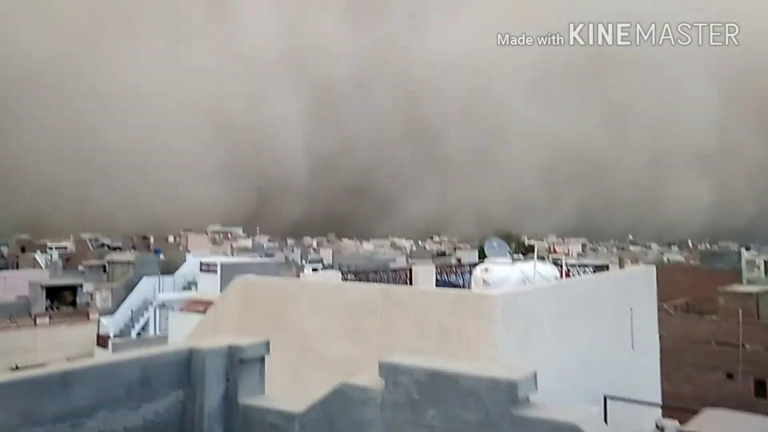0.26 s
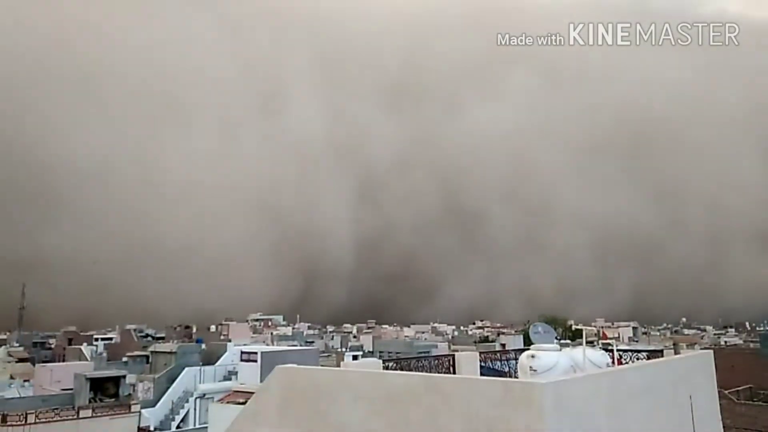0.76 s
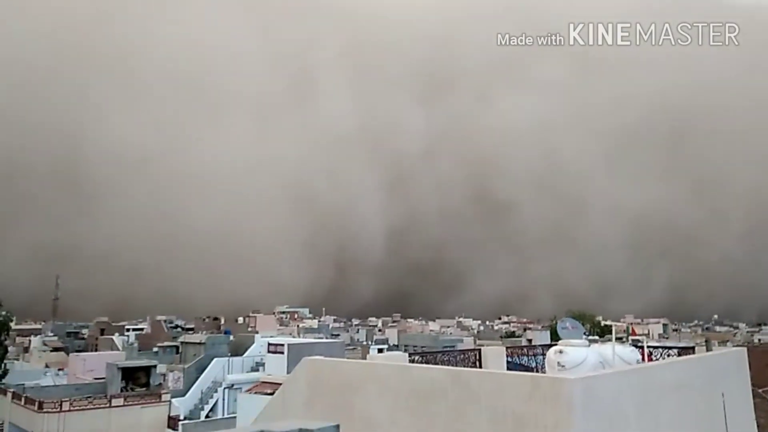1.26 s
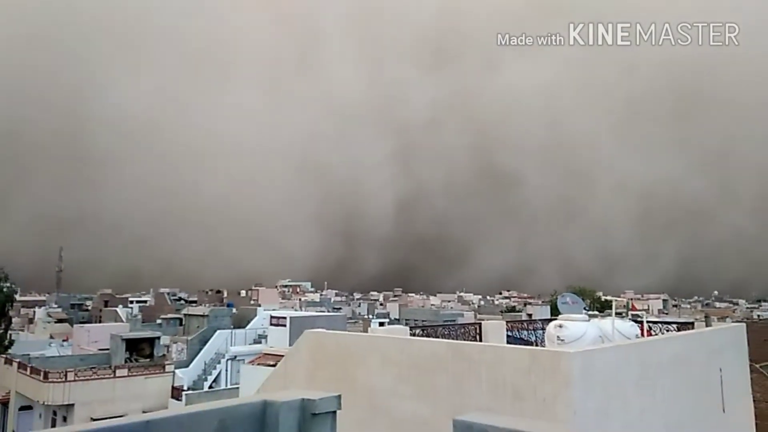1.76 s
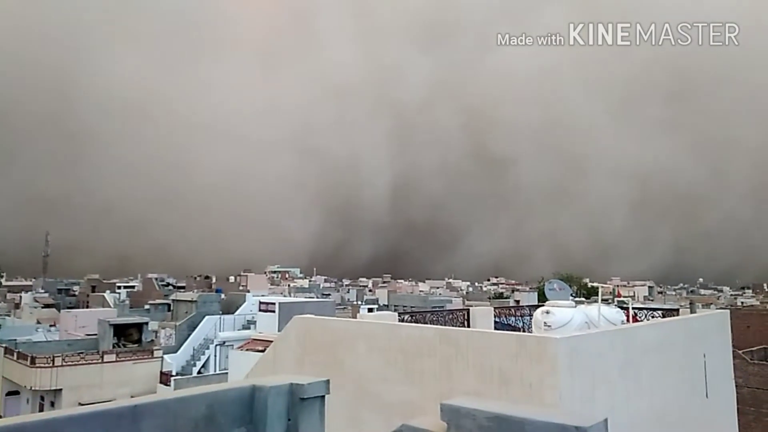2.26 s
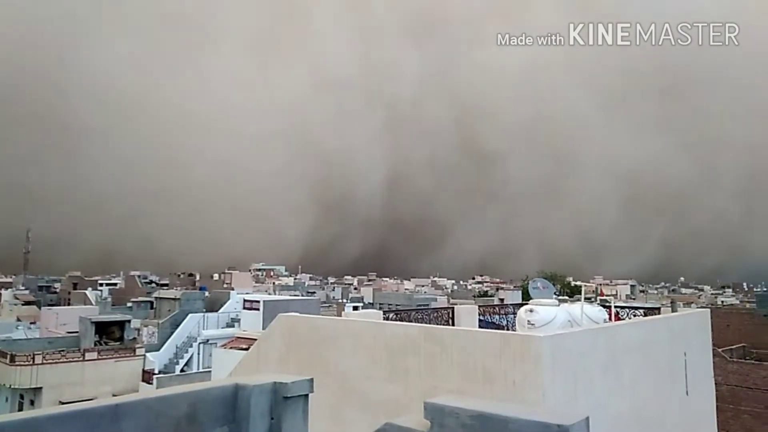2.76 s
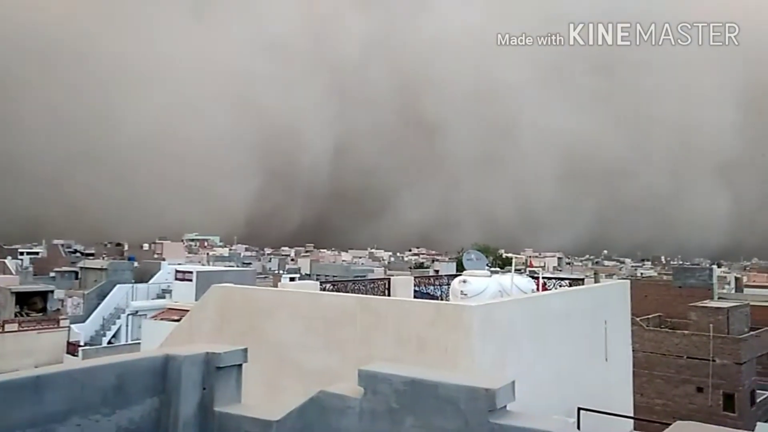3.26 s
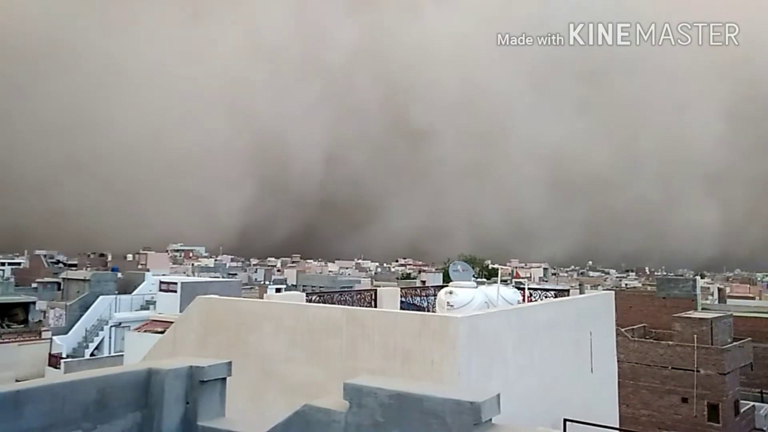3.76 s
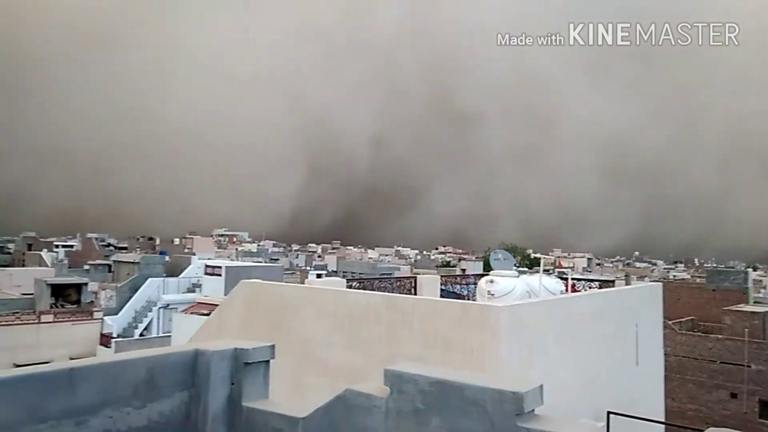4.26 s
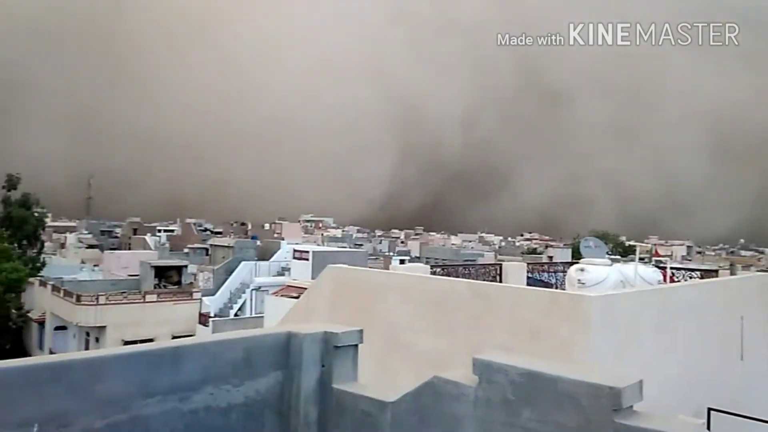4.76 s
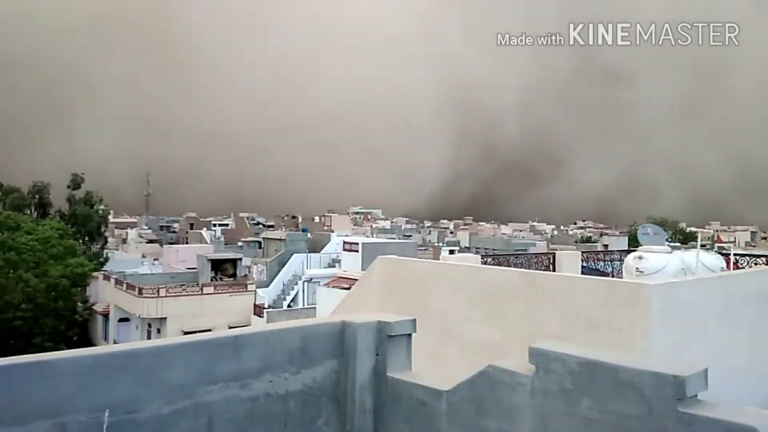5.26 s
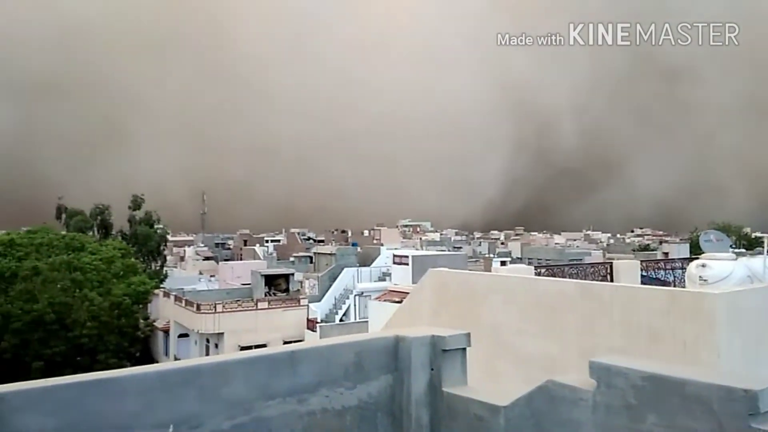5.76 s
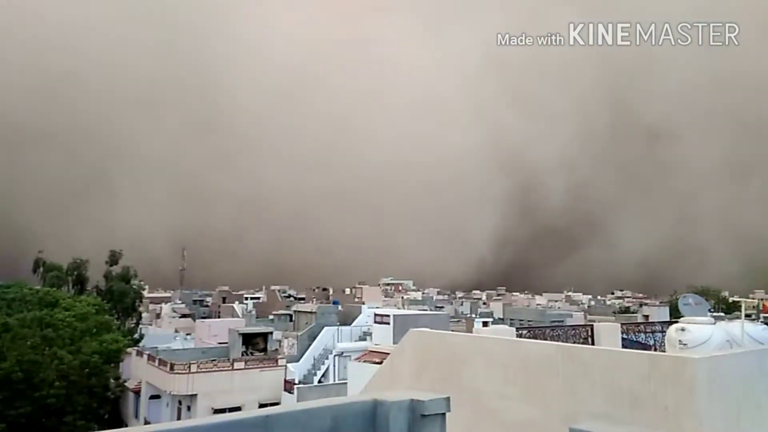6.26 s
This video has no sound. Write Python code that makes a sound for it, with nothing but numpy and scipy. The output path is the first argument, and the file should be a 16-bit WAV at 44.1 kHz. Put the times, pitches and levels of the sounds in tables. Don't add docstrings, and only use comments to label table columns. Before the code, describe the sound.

Low, rough wind rushes without pause over a small exposed microphone outdoors, swelling and easing, with dull thuds, quick flaps and a few dust ticks.

```python
import sys
import numpy as np
from scipy import signal
from scipy.fft import rfft, irfft
from scipy.io import wavfile
from scipy.ndimage import uniform_filter1d

SR = 44100
rng = np.random.default_rng(int(sys.argv[2]) if len(sys.argv) > 2 else 0)


def wrap_up_sound(samples):
    columns = np.atleast_2d(samples).T
    tamed = np.clip(columns, -1, 1)
    steps = np.round(tamed * 32767).astype(np.int16)
    wavfile.write(sys.argv[1], SR, steps)


def convert_level_to_amplitude(level_db):
    exponent = np.asarray(level_db, float) / 20
    return 10 ** exponent


N = 287532


def unit(x):
    return x / np.sqrt(np.mean(x ** 2))


def colour(x, points):
    hz, db = np.transpose(points)
    log_hz = np.log(np.arange(len(x) // 2 + 1) * SR / len(x) + 1)
    return irfft(rfft(x) * convert_level_to_amplitude(np.interp(log_hz, np.log(hz), db)), len(x))


def walk(rate):
    hold = int(SR / rate)
    steps = np.repeat(rng.standard_normal(N // hold + 1), hold)
    return unit(uniform_filter1d(uniform_filter1d(steps, hold), hold)[:N])


def bandpass(x, low_hz, high_hz, order=2):
    return signal.sosfilt(signal.butter(order, [low_hz, high_hz], "band", fs=SR, output="sos"), x)


def band(hz):
    return unit(bandpass(rng.standard_normal(N), hz / 2 ** (1 / 4), hz * 2 ** (1 / 4)))


def eddies(rows):
    out = np.zeros(N + 2 * SR)
    chance = rng.random((len(rows), 2))
    for (s, db, hz, cycles), (turn, drift) in zip(rows, chance):
        sigma = cycles / hz / 2.5
        reach = int(4 * sigma * SR)
        t = np.arange(-reach, reach) / SR
        if s + sigma >= N / SR:
            turn = .5
        bend = 1 + 0.084 * (drift - .5) * t / sigma
        phase = 2 * np.pi * (hz * t * bend + turn)
        at = SR + int((s + t[0]) * SR)
        out[at:at + len(t)] += convert_level_to_amplitude(db) * np.exp(-(t / sigma) ** 2 / 2) * np.cos(phase)
    return out[SR:SR + N]


# (time [s], depth [dB], pitch [Hz])
LULL_DIPS = [(0.2, -3, 107), (0.345, -3.5, 151), (0.53, -6, 151), (1.145, -5, 45), (1.252, -5, 151),
             (1.256, -5, 64), (1.395, -5, 45), (1.629, -6, 45), (1.768, -3.5, 360), (1.887, -7, 45),
             (2.054, -5, 45), (2.215, -3.5, 720), (2.298, -5.5, 180), (2.4, -5, 45), (2.617, -7.5, 45),
             (3.141, -5, 45), (3.5, -8, 200), (3.778, -6.5, 107), (4.108, -3, 45), (4.208, -4.5, 720),
             (4.216, -5, 45), (4.309, -6.5, 214), (4.545, -3.5, 90), (4.616, -5, 45), (5.459, -7, 303),
             (5.564, -4.5, 605), (5.591, -10, 45), (5.815, -5, 45), (5.83, -3.5, 180), (6.519, -5, 45),
             (6.519, -6, 107)]


def lulls(t, hz):
    loss_db = 0
    for s, db, centre_hz in LULL_DIPS:
        away_time = (t - s) / 0.037
        away_pitch = np.log2(hz / centre_hz) / 0.49
        loss_db = loss_db + db * np.exp(-away_time ** 2 / 2 - away_pitch ** 2 / 2)
    return loss_db


# (time [s], strength [dB], eddy size [dB], above 0 it rumbles and below 0 it rushes)
WIND = [(0.0, -30, -9), (0.13, -26.5, -2.5), (0.31, -27.5, -4.5), (1.85, -29, -1), (2.09, -29.5, -8.5),
        (2.43, -29, 7), (2.47, -29, 4.5), (2.81, -27, 4.5), (3.29, -28.5, 1), (3.79, -28, 0),
        (3.9, -26.5, 10), (4.5, -29.5, 5), (4.56, -27, -11.5), (4.65, -27.5, 11.5), (5.27, -27.5, -0.5),
        (5.54, -27, 7.5), (5.9, -29.5, -6.5), (6.52, -27, 0)]


def gusts():
    s, strength_db, size_db = np.transpose(WIND)
    t = np.arange(N) / SR
    return np.interp(t, s, strength_db), np.interp(t, s, size_db)


# (frequency [Hz], level [dB per Hz])
STREAM_SPECTRUM = [(20, -19), (35, 2.5), (70, -1.5), (170, -2), (330, -9.5), (600, -20.5), (1100, -31.5),
                   (2000, -43.5), (3500, -54), (6000, -74)]


def stream(rush_db, bass_db, treble_db):
    out = 0
    slow, middle, quick = walk(26), walk(30), walk(60)
    level_db = rush_db.mean()
    rush_db, bass_db, treble_db = (x - x.mean() for x in (rush_db, bass_db, treble_db))
    for k in range(17):
        hz = 22 * 2 ** (k / 2)
        low = np.clip((4.5 - k) / 1.5, 0, 1)
        high = np.clip((k - 9) / 2, 0, 1)
        fade = np.clip(1.2 - 0.2 * max(k - 11, 0), 0, 1)
        surge_db = 2.2 * low * slow + 1.9 * (1 - low) * (1 - high) * middle
        surge_db = surge_db + (1.3 * middle + 1.7 * quick) * high
        tilt_db = 0.52 * low * bass_db + 0.58 * high * treble_db
        db = fade * (rush_db + tilt_db + surge_db + 1.73 * walk(12 + 3 * k))
        db = db + np.repeat(lulls(np.arange(0, N, 64) / SR, hz), 64)[:N]
        out = out + convert_level_to_amplitude(db) * np.sqrt(hz) * band(hz)
    return unit(colour(out, STREAM_SPECTRUM)) * convert_level_to_amplitude(level_db + 5.0)


# (frequency [Hz], level [dB per Hz])
HISS_SPECTRUM = [(1500, 5.5), (4000, -4), (6500, -6.5), (7800, -4), (9100, -0.5), (10300, -6.5),
                 (12000, -14.5), (15500, -19.5), (20000, -5.5)]


def hiss():
    shimmer_db = .3 * walk(14) + .7 * walk(60)
    noise = colour(rng.standard_normal(N), np.vstack([[(300, -30.0)], HISS_SPECTRUM]))
    return unit(noise) * convert_level_to_amplitude(-59.0 + shimmer_db)


def swarm(rate):
    when, size, octave, length = rng.random((int(rate * N / SR), 4)).T
    octave = 2.65 * octave
    db = -32 - 7.3 * octave - 2.6 * np.log(size + 0.048)
    return eddies(np.transpose([when * N / SR, db, 350 * 2 ** octave, 1.4 + 2.0 * length]))


def crowd(gust_db, rate):
    when, size, octave, length = rng.random((int(rate * N / SR), 4)).T
    octave = 3.55 * octave
    hz = 42 * 2 ** octave
    s = when * N / SR
    db = -21 - 2.5 * octave - 0.5 * np.log(size + 0.036)
    db = db + (gust_db - gust_db.mean())[(when * N).astype(int)] + lulls(s, hz)
    return eddies(np.transpose([s, db, hz, 0.6 + octave * (0.63 + 2.1 * length)]))


# (start [s], length [s], peak [dB], lowest pitch [Hz])
VORTEX_TRAINS = [(0.26, 0.034, -18, 426), (0.49, 0.068, -19, 286), (0.695, 0.01, -26, 730),
                 (1.592, 0.041, -16.5, 380), (1.786, 0.058, -26.5, 680), (2.18, 0.039, -22.5, 480),
                 (2.31, 0.083, -27, 620), (2.834, 0.077, -16.5, 350), (3.617, 0.03, -15, 394),
                 (3.654, 0.05, -21, 560), (4.001, 0.03, -22, 466), (4.981, 0.045, -24, 480),
                 (5.1, 0.03, -20, 420), (5.158, 0.017, -23, 480), (6.125, 0.073, -18, 338),
                 (6.349, .014, -23.5, 496), (5.955, 0.012, -40, 1700), (0.695, 0.009, -34, 1230),
                 (2.311, 0.085, -35, 1530), (3.632, 0.015, -32.5, 1300), (1.598, 0.025, -35, 770),
                 (4.007, 0.008, -45, 1900), (0.057, 0.053, -29.5, 520), (3.3, .06, -28, 334),
                 (.85, .13, -22, 75), (1.1, .2, -20.5, 55), (3.24, 0.093, -21.5, 85), (5.72, .09, -21, 59),
                 (4.754, .1, -32.5, 670), (3.8, 0.027, -25.5, 367)]


def trains(count):
    late, chance, length = rng.random((len(VORTEX_TRAINS), count, 3)).T
    s, span, db, hz = np.transpose(VORTEX_TRAINS)
    order = np.arange(count)[:, None]
    octaves = np.clip(np.log2(2350 / hz), .2, 1.59)
    octave = octaves * ((order * 3 % count + chance) / count) ** 2
    when = s + span * (order + late) / count
    rows = np.transpose([when, db - 12.5 * octave, hz * 2 ** octave, 1.3 + 2.6 * length])
    return eddies(rows.reshape(-1, 4))


def shedding():
    t = np.arange(N) / SR
    on = sum((t > s) & (t < s + span) for s, span, *_ in VORTEX_TRAINS)
    return uniform_filter1d(1. * on, int(0.031 * SR))


# (time [s], peak [dB], pitch [Hz])
EDGE_FLUTTERS = [(.073, -30, 676), (.134, -32, 1170), (.161, -32, 800), (.392, -24.5, 1000),
                 (.559, -19.5, 580), (.66, -24.5, 900), (.801, -25, 870), (.847, -41, 1700),
                 (1.218, -29, 651), (2.507, -26, 890), (2.83, -29, 685), (3.048, -30, 1351),
                 (3.187, -22, 870), (3.565, -21.5, 665), (3.643, -13, 497), (3.709, -23, 770),
                 (3.75, -29, 1100), (3.824, -18, 507), (3.987, -34, 1800), (4.433, -33, 1490),
                 (4.729, -24, 790), (4.757, -32, 1290), (4.793, -31, 1176), (4.911, -24, 880),
                 (5.182, -25.5, 1024), (5.528, -33.5, 1783), (5.39, -40, 1500), (6.079, -31, 640),
                 (6.231, -33, 1300), (6.316, -26, 690)]


def flutters():
    hz = np.transpose(EDGE_FLUTTERS)[2]
    cycles = 0.86 + 1.3 * rng.random(len(hz)) * hz / 800
    return eddies(np.column_stack([EDGE_FLUTTERS, cycles]))


# (time [s], peak [dB], pitch [Hz], length [cycles])
PORT_BUFFETS = [(.131, -15, 345, 2.4), (.173, -11, 256, 1.04), (0.254, -10, 151, 1.3),
                (0.272, -15, 295, 5.2), (.65, -15.5, 382, 4.1), (.741, -11, 194, 1.3),
                (.77, -12.5, 169, 2.4), (1.257, -14.5, 292, 3.5), (1.823, -17.5, 172, 3.5),
                (2.136, -14, 183, 1.9), (2.381, -12, 277, 1.6), (2.581, -14.5, 345, 3.6),
                (2.724, -17.5, 386, 7.3), (3.732, -9.5, 291, 1.7), (3.851, -11.5, 142, 1.96),
                (4.062, -15, 214, 2.8), (4.187, -15.5, 410, 4.1), (4.224, -15.5, 164, 2.9),
                (4.418, -16.5, 151.3, 4.8), (4.443, -8.5, 210, 1.7), (4.613, -10, 282, 1.9),
                (4.635, -7, 155, 1.06), (4.672, -12.5, 290, 2.7), (4.907, -16.5, 318, 4.4),
                (5.088, -7, 194, 2.5), (5.162, -15, 171, 3.5), (5.203, -10.5, 215, 2),
                (6.08, -12, 191, 2.7), (6.391, -9, 189, 2), (6.453, -17, 220, 5.8)]


def buffets():
    return eddies(PORT_BUFFETS)


# (time [s], peak [dB])
RIM_SNAPS = [(0.1326, -33), (0.2768, -30), (0.3905, -31), (0.5826, -33), (0.6579, -34), (0.6579, -31),
             (0.6953, -29), (0.7562, -34), (0.8001, -32), (0.9732, -38), (1.5968, -31.5), (1.6072, -35),
             (1.9245, -38), (2.136, -38), (2.1365, -34), (2.38, -30), (2.5062, -33), (2.5461, -38),
             (2.617, -33), (3.0465, -36), (3.1852, -30.5), (3.3293, -35), (3.3992, -35), (3.5438, -33),
             (3.6177, -30), (3.6611, -34), (3.7489, -28.5), (3.8247, -34), (3.8247, -32), (4.0198, -40),
             (4.3411, -39), (4.4813, -35), (4.4983, -34), (4.619, -35), (4.7018, -37), (4.7268, -35),
             (4.7552, -33), (4.7916, -35), (4.844, -34), (4.8849, -35), (4.9084, -33), (4.9832, -33),
             (5.0705, -37), (5.0795, -35), (5.1224, -29), (5.1618, -31), (5.1802, -30), (5.3209, -35),
             (5.3888, -34), (5.4686, -33), (5.526, -34), (5.6532, -37), (5.7894, -33), (5.956, -36),
             (6.0413, -36), (6.0802, -36), (6.0996, -31), (6.2393, -33), (6.3546, -29.5)]


def snaps():
    jolts = np.zeros(N)
    s, db = np.transpose(RIM_SNAPS)
    jolts[((s + .001) * SR).astype(int)] = convert_level_to_amplitude(db + 2.5) * np.sign(rng.random(len(s)) - .5)
    t = np.arange(400) / SR
    rise_s, fall_s = .00012, 0.00043
    push = t / rise_s * np.exp(-t / rise_s)
    rebound = t * rise_s / fall_s ** 2 * np.exp(-t / fall_s)
    return bandpass(np.convolve(jolts, np.e * (push - rebound))[:N], 560, 2300, order=3)


# (time [s], peak [dB], pitch [Hz])
RIM_CRACKS = [(.2745, -42, 2400), (.399, -42, 2800), (.6965, -43, 2800), (.847, -42, 2200),
              (1.2365, -42, 2300), (2.3145, -40, 2200), (2.335, -41, 2300), (2.3685, -40, 2100),
              (3.224, -43, 2300), (3.9873, -42, 2200), (4.0123, -40, 2300), (4.026, -38, 2300),
              (4.099, -43, 2000), (4.2445, -43, 2200), (5.246, -41, 2000), (5.39, -40, 2300),
              (5.528, -41, 2300), (5.959, -39, 2350), (5.968, -43, 2400), (5.983, -42, 2100),
              (.6972, -24, 1600), (.6993, -17, 620), (.7035, -20, 900), (.135, -24, 900), (1.597, -25, 650),
              (2.316, -28, 750), (2.507, -27, 750), (2.83, -28, 650), (3.643, -20, 700), (3.6885, -25, 800),
              (3.71, -24, 750), (3.742, -30, 900), (4.729, -29, 750), (4.912, -27, 800), (5.39, -28, 750),
              (6.081, -30, 700), (6.131, -27, 650), (6.316, -27, 700), (3.57, -14, 220), (3.626, -17, 430),
              (2.3, -13, 100), (2.78, -13, 75), (4.0213, -29, 2000), (4.02145, -37, 3300),
              (4.846, -43, 2500), (4.77, -46, 3000), (4.771, -35, 1500), (4.442, -36, 1700),
              (3.612, -22, 700), (3.668, -21, 700), (3.70, -24, 900), (3.63, -20, 750), (4.705, -29, 900),
              (4.945, -31, 1100), (5.163, -31, 1200), (5.02, -23, 600)]


def cracks():
    hz = np.transpose(RIM_CRACKS)[2]
    return eddies(np.column_stack([RIM_CRACKS, .6 + .55 * hz / 1000]))


# (time [s], peak [dB], pitch [Hz])
LESSER_WHIRLS = [(.142, -13, 108), (0.202, -13.5, 300), (.336, -17.5, 400), (0.391, -13, 108),
                 (.833, -14, 187), (.934, -18, 293), (1.624, -19, 256), (1.952, -15.5, 303),
                 (2.205, -18, 60), (2.33, -18.5, 256), (2.662, -13, 218), (3.075, -16.5, 277),
                 (3.228, -13, 42), (3.443, -16.5, 286), (3.702, -14, 65.6), (3.721, -15, 210),
                 (4.019, -17.5, 218), (4.085, -15.5, 42), (4.116, -13.5, 60), (4.47, -18, 330),
                 (4.737, -14, 64), (5.06, -18, 335), (5.175, -14.5, 72), (5.234, -14, 250),
                 (5.269, -12.5, 114), (5.486, -10, 100), (5.564, -13, 42), (5.642, -16, 289),
                 (5.706, -16, 42.5), (5.863, -12.5, 71)]


def whirls():
    hz = np.transpose(LESSER_WHIRLS)[2]
    return eddies(np.column_stack([LESSER_WHIRLS, 1.03 + 0.43 * np.log2(hz / 40)]))


# (time [s], peak [dB], pitch [Hz], length [cycles])
SLOW_SWIRLS = [(0.204, -19, 308, 4), (0.3, -16.0, 330, 2.1), (0.333, -21, 269, 4), (0.538, -19.5, 288, 4.3),
               (0.583, -21, 330, 4), (0.843, -21, 308, 2.2), (0.966, -22.5, 118, 4),
               (1.164, -17.5, 68, 1.2), (1.301, -17.0, 178, 2.3), (1.608, -18, 330, 1.2),
               (2.333, -16.5, 110, 2.4), (2.37, -16, 204, 2.2), (2.409, -14, 78, 4), (2.628, -21.0, 269, 4),
               (2.818, -11, 190, 1.2), (2.909, -11, 63, 2), (3.22, -12.5, 103, 1.2), (3.469, -17, 45, 1.3),
               (3.703, -14.5, 155, 1.1), (3.72, -25, 48, 4), (3.91, -19.0, 45, 2.2),
               (4.02, -18.5, 204, 2.2), (4.061, -19, 204, 2.5), (4.096, -18.5, 234, 3.6),
               (4.149, -22, 68, 5), (4.258, -13, 103, 0.98), (4.733, -21, 68, 2.4), (4.802, -19.5, 52, 1.2),
               (5.107, -24, 45, 4.5), (5.124, -18.5, 330, 2.2), (5.153, -25, 330, 3.7), (5.172, -14, 84, 1),
               (5.305, -17, 89, 3.5), (5.361, -14.5, 118, 0.83), (5.465, -12, 78, 1.2), (5.587, -21, 96, 4),
               (5.77, -18.5, 73, 4), (6.021, -16, 190, 2.7), (6.141, -20, 288, 4.3),
               (6.454, -17.5, 234, 1.8)]


def swirls():
    return eddies(SLOW_SWIRLS)


# (time [s], peak [dB], pitch [Hz], length [cycles])
HIGH_SWIRLS = [(0.246, -25, 498, 4), (0.276, -25, 498, 3.7), (0.278, -39, 1705, 4), (0.3, -16, 330, 2.2),
               (0.391, -33.0, 921, 4), (0.483, -36, 1487, 4), (0.565, -21, 498, 4), (0.584, -29, 860, 3.5),
               (0.702, -28, 1131, 2.2), (0.716, -40, 1705, 4), (0.758, -35, 1056, 4),
               (0.801, -27.5, 611, 3.5), (0.844, -19.5, 330, 2.3), (1.059, -41.0, 1592, 4),
               (1.218, -20, 498, 1.7), (1.237, -41, 1955, 4), (1.608, -13.5, 434, 2), (1.611, -29, 910, 3),
               (2.151, -22.5, 470, 4), (2.33, -39.0, 1388, 4), (2.369, -41.0, 1825, 4),
               (2.382, -41.0, 1705, 4), (2.849, -27, 611, 4.6), (2.884, -20, 375, 4.3), (2.924, -22, 465, 4),
               (3.546, -34, 1056, 4), (3.62, -14, 434, 2.2), (3.645, -38.5, 1388, 4), (3.663, -39, 1131, 4),
               (3.688, -25.0, 750, 2.2), (3.709, -24, 700, 2.4), (3.759, -18, 408, 4), (4.5, -33.5, 1131, 4),
               (4.623, -16, 330, 2.5), (4.846, -35, 1487, 2.2), (5.006, -24, 498, 4), (5.082, -30.5, 921, 4),
               (5.094, -15, 330, 1.2), (5.123, -28, 1131, 2.2), (5.124, -15, 434, 2), (5.152, -15, 330, 2.2),
               (5.322, -35, 1131, 4), (5.326, -21.5, 405, 3.5), (5.9575, -33, 1780, 4), (5.967, -41, 1825, 3),
               (6.102, -30, 986, 4), (6.356, -32, 1220, 3.4)]


def high_swirls():
    return eddies(HIGH_SWIRLS)


# (time [s], peak [dB], pitch [Hz], length [cycles])
DEEP_THUMPS = [(.613, -11, 128, 1), (0.6998, -7, 45, 0.61), (1.456, -10, 113, 1.4), (1.49, -8.5, 115, 0.76),
               (1.515, -7, 101, 1.95), (1.72, -13, 97, 1.5), (1.806, -13, 54.7, 0.92),
               (2.387, -14, 56.6, 1.75), (2.413, -11, 86, 2.7), (2.718, -8, 57.5, 0.7),
               (2.907, -8, 55, 1.4), (2.924, -10, 84.7, 1.2), (3.046, -10, 107, 2),
               (3.362, -12.5, 108, 1.1), (3.913, -13, 42, 0.55), (3.991, -12, 56.87, 1.5),
               (4.15, -11, 56, 1.3), (4.262, -15, 111, 4.3), (4.381, -8.5, 98, 1.44),
               (4.621, -10, 127, 1.8), (4.673, -11.5, 86, 1.1), (4.959, -11.5, 83, 2.3),
               (5.065, -8, 97, 1.44), (5.292, -9, 85.5, 1.5), (5.318, -6.5, 112, 0.85),
               (5.362, -12, 110, 1.6), (5.412, -12, 112, 0.79), (5.47, -15, 32.4, 2.6),
               (5.533, -10.5, 115, 1.4), (6.5195, -14, 118, 0.61)]


def thumps():
    return eddies(DEEP_THUMPS)


def thumping():
    t = np.arange(N) / SR
    near = np.zeros(N)
    for table in (DEEP_THUMPS, LESSER_WHIRLS):
        for s, _, hz, *_ in table:
            if hz < 130:
                near += np.clip(1 - abs(t - s) / .06, 0, 1)
    return np.minimum(near, 1)


def wakes(big):
    out = 0
    for hz in 250 * 2 ** np.arange(0, 4, .5):
        parent = bandpass(big, hz / 1.5, hz / 0.74)
        keep = np.exp(-1 / (SR * (0.0043 + 4.2 / hz)))
        strength = np.sqrt(signal.lfilter([1 - keep], [1, -keep], parent ** 2))
        out = out + convert_level_to_amplitude(-12.0 - 1.5 * np.log2(hz / 250)) * strength * band(hz)
    return out


# (time [s], peak [dB])
GRAINS = [(0.8004, -27), (2.382, -29), (4.0212, -9), (4.0256, -25), (4.7546, -32), (4.769, -29),
          (4.791, -31), (4.8444, -26), (5.247, -43), (5.3898, -32), (5.4711, -41)]


def ticks():
    out = np.zeros(N)
    t = np.arange(1600) / SR
    step = np.exp(-t / .0009) - np.exp(-t / .00016)
    case = band(5700)
    for s, db in GRAINS:
        at = int(s * SR)
        fizz = convert_level_to_amplitude(-50) * np.exp(-t / .016) * case[at:at + len(t)]
        out[at:at + len(t)] -= convert_level_to_amplitude(db) * (step + fizz)
    return signal.sosfilt(signal.butter(2, 6500, fs=SR, output="sos"), out)


def scene():
    gust_db, size_db = gusts()
    lift_db = 1 * shedding()
    bass_db = size_db + 0.5 * thumping()
    port = stream(gust_db + 0.45 * lift_db, bass_db, lift_db - .2 * size_db)
    port = port + hiss() + swarm(rate=150)
    big = crowd(gust_db, rate=9) + trains(count=7) + flutters() + buffets() + whirls() + thumps()
    port = port + big + wakes(big)
    port = port + snaps() + cracks() + swirls() + high_swirls() + ticks()
    fade_in = np.minimum(np.arange(N) / SR / .006, 1)
    return (port * fade_in)[None, :]


def roll_off(x):
    return signal.sosfilt(signal.butter(12, 15500, fs=SR, output="sos"), x)


def record(dry):
    x = signal.sosfilt(signal.butter(2, 18, "high", fs=SR, output="sos"), dry)
    mix = np.tanh(1.549 * x) / 1.788
    return roll_off(mix)


dry = scene()
out = record(dry)
wrap_up_sound(out)
```